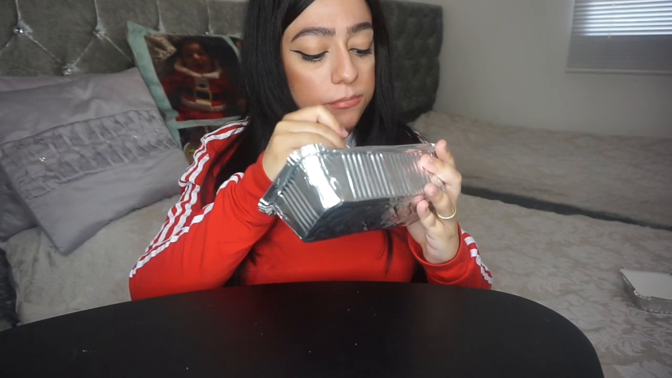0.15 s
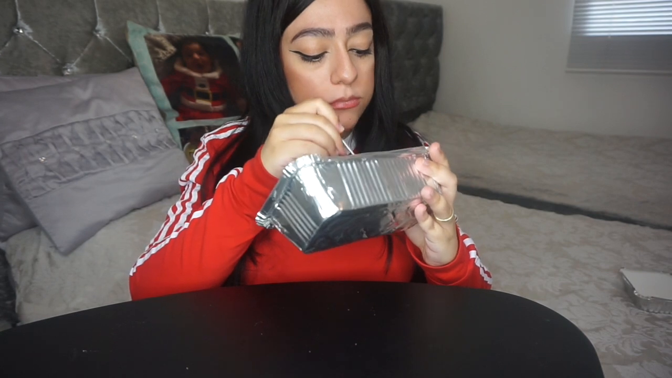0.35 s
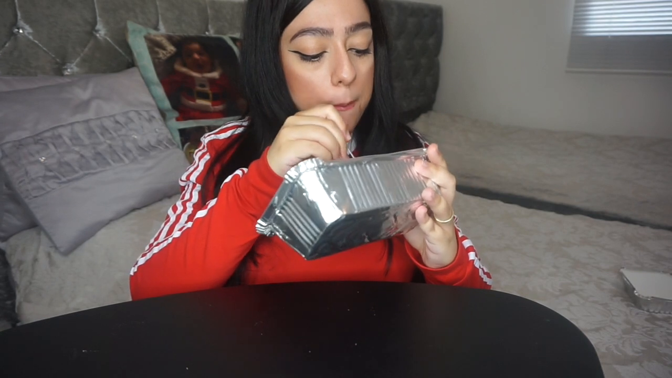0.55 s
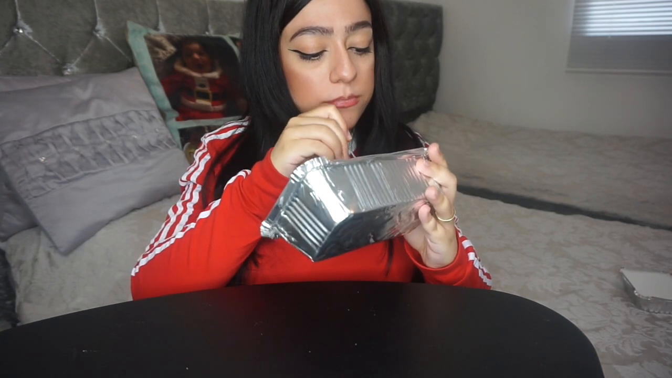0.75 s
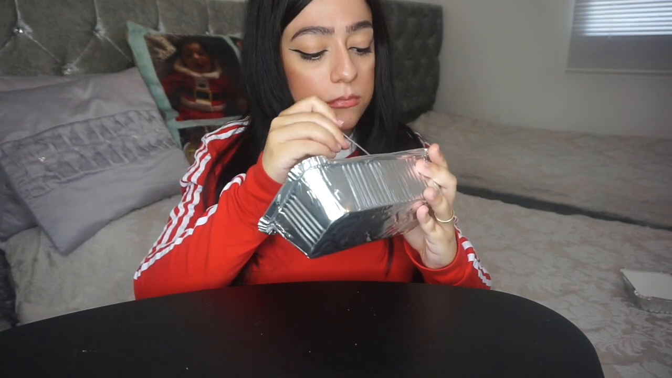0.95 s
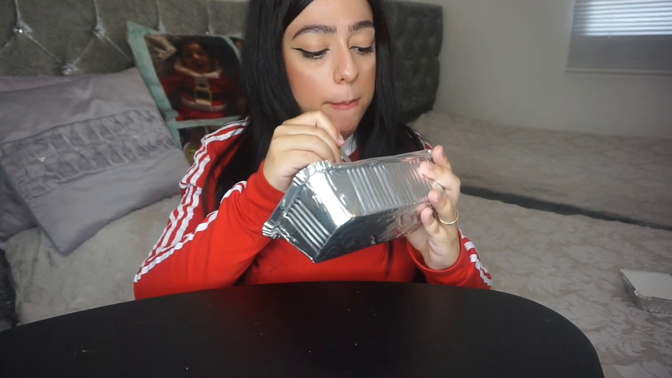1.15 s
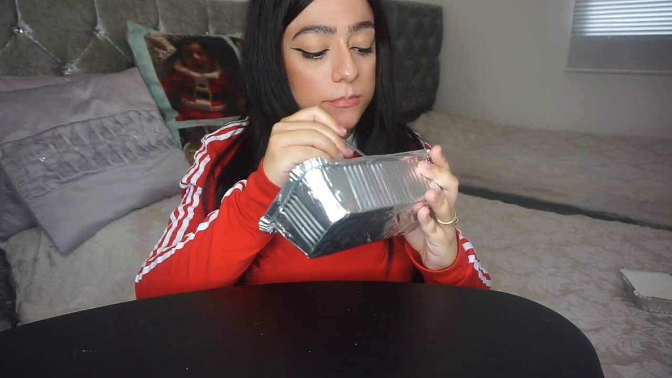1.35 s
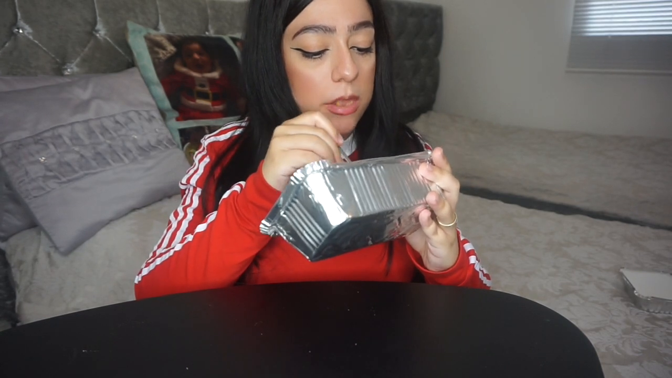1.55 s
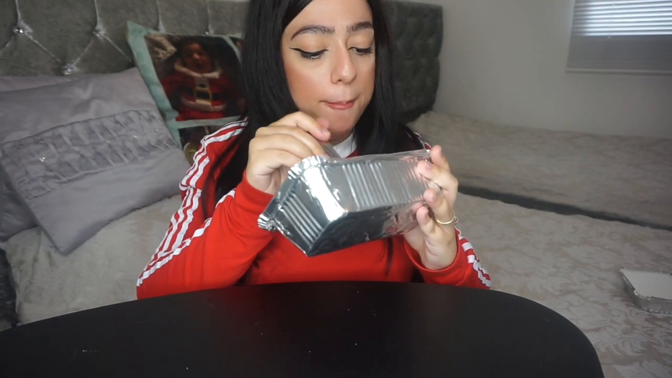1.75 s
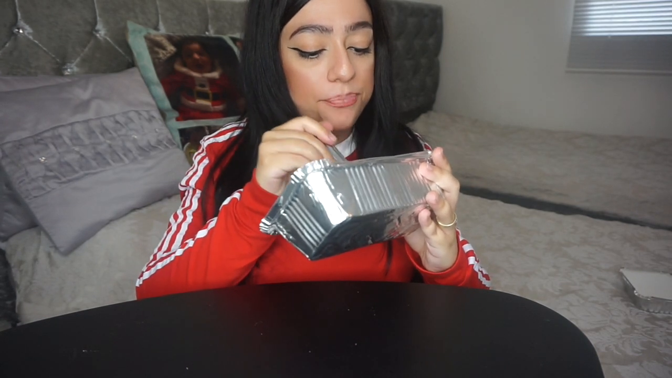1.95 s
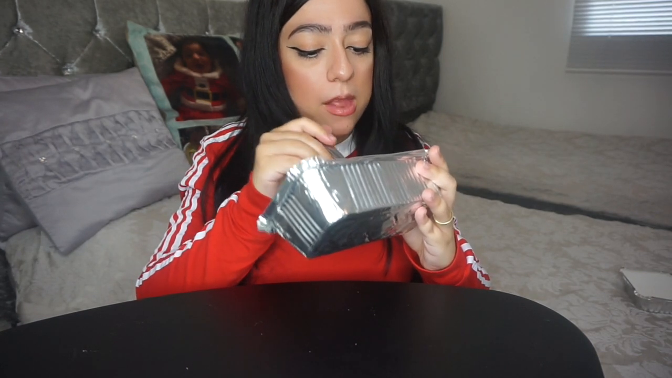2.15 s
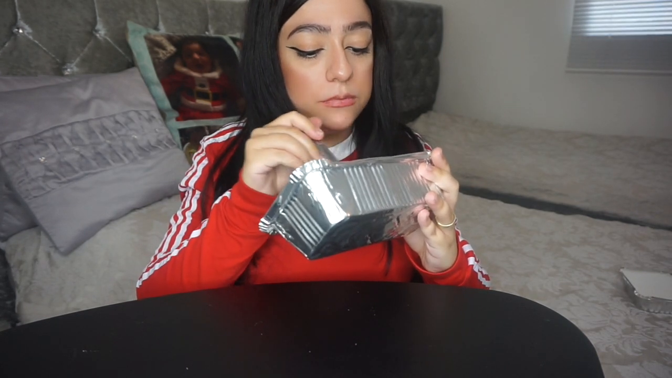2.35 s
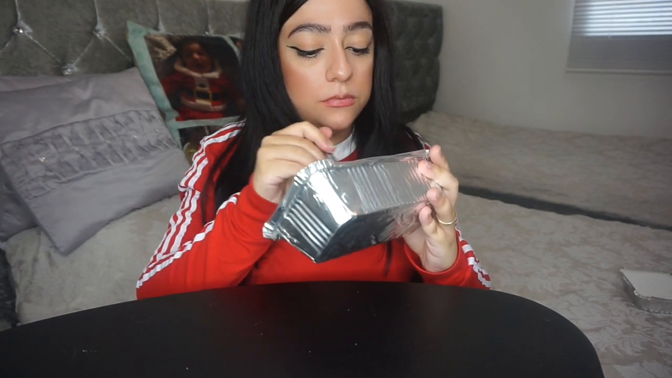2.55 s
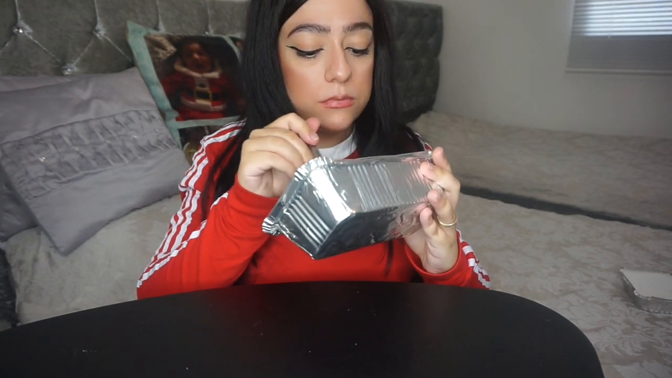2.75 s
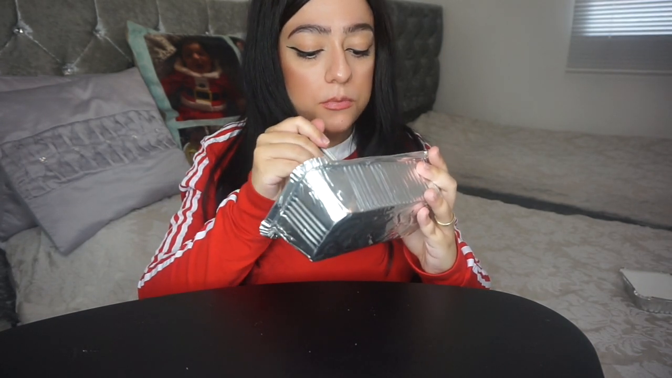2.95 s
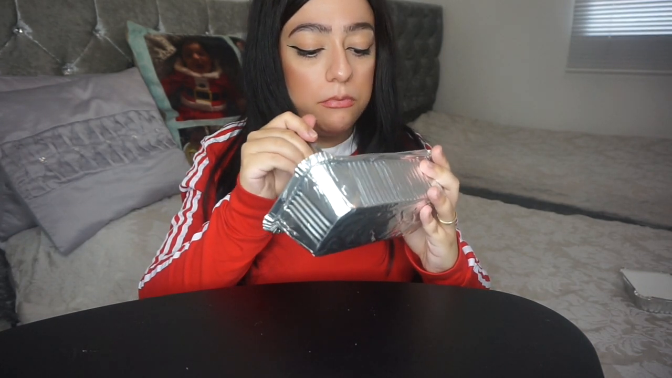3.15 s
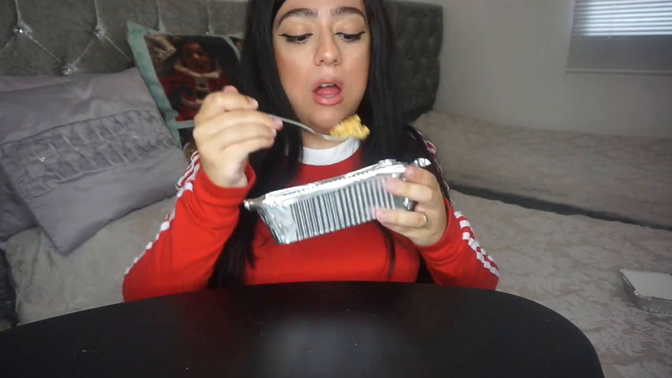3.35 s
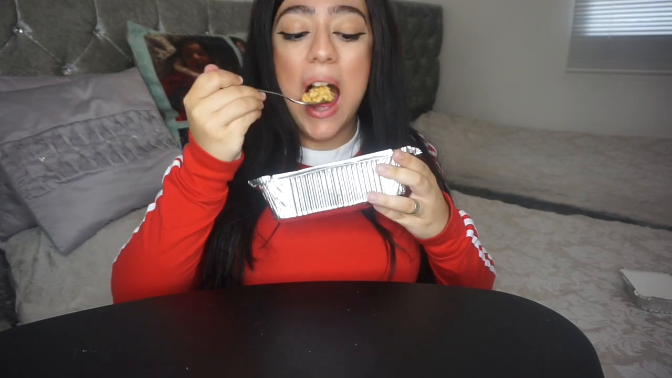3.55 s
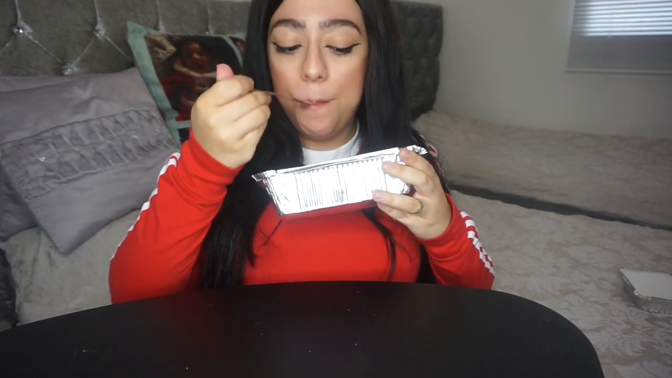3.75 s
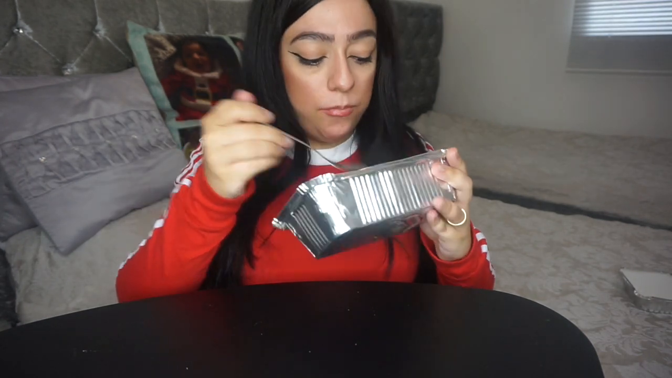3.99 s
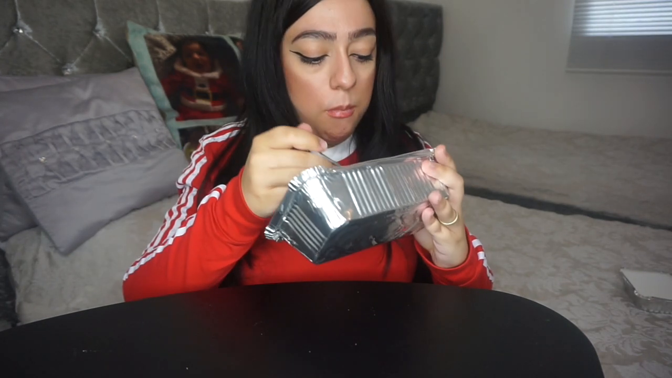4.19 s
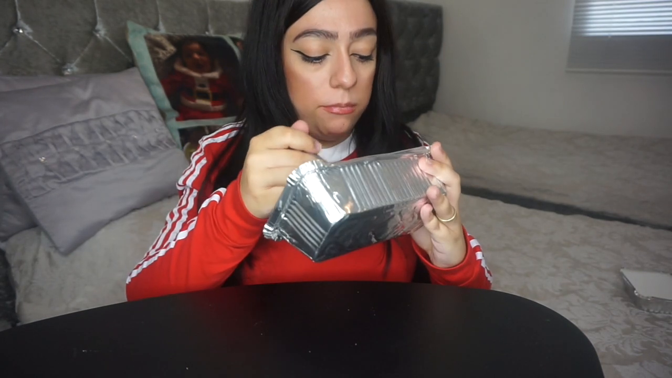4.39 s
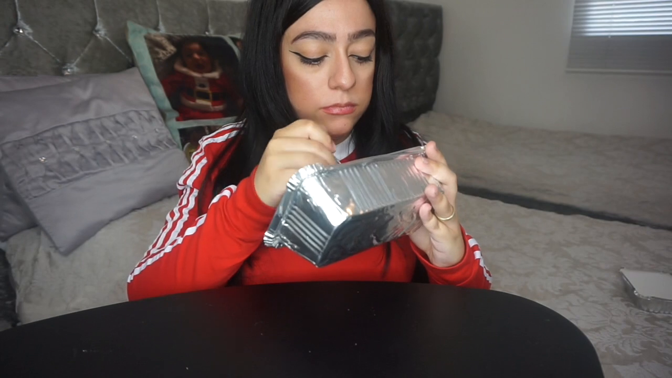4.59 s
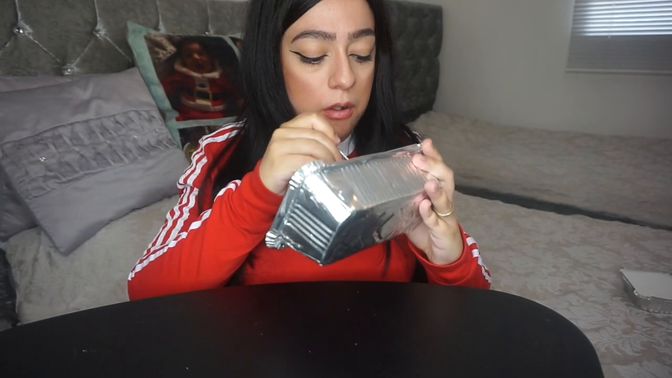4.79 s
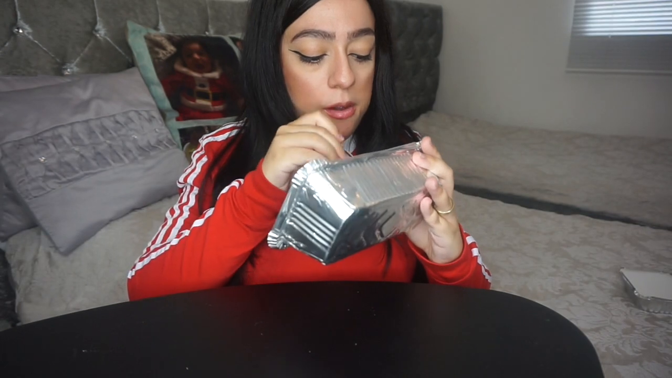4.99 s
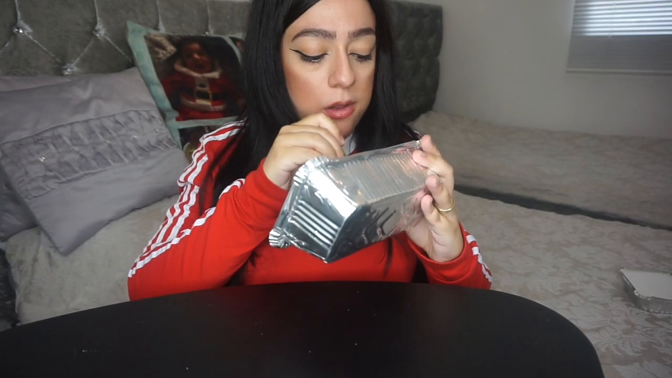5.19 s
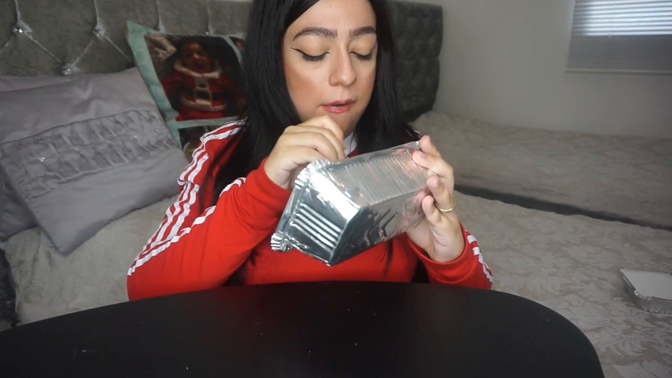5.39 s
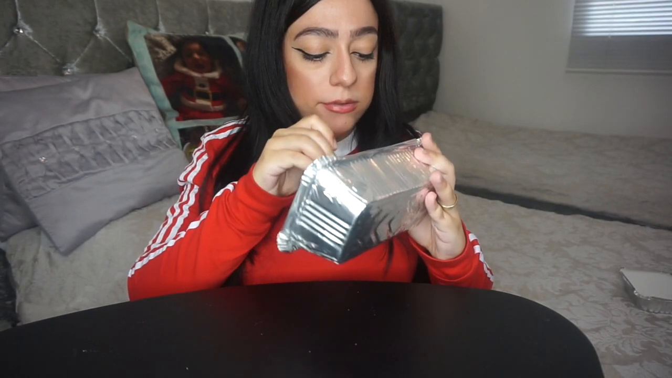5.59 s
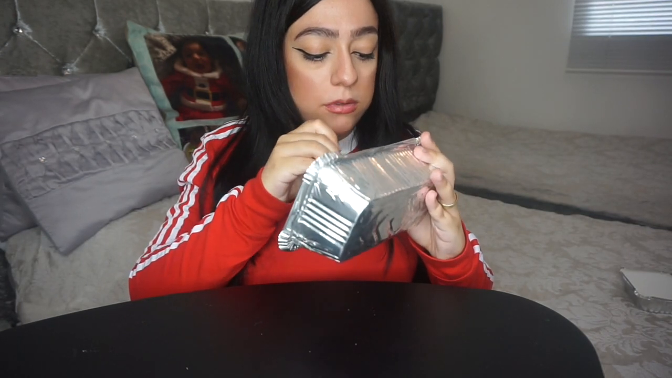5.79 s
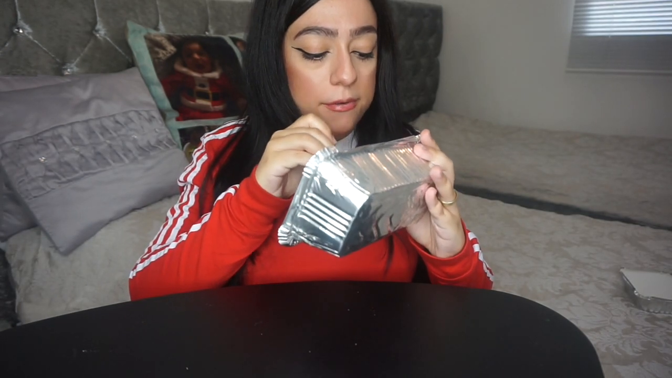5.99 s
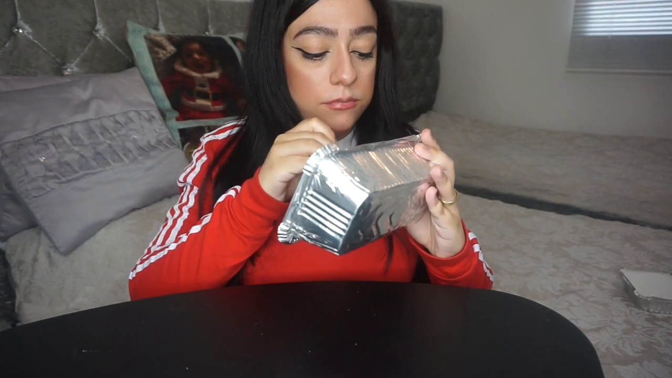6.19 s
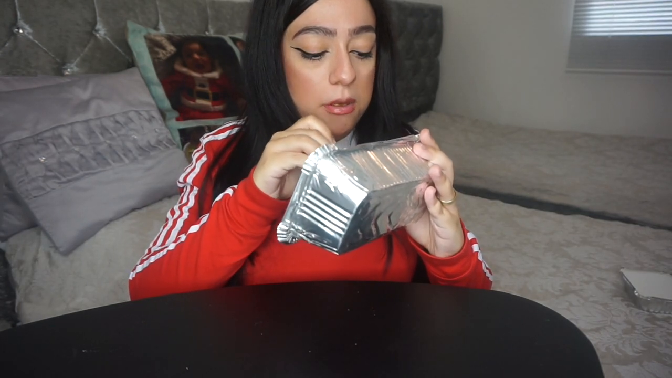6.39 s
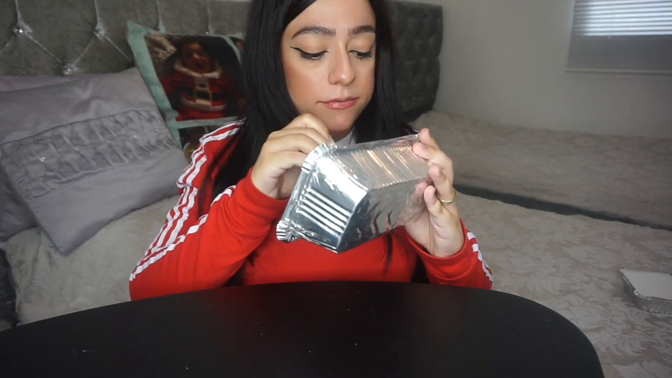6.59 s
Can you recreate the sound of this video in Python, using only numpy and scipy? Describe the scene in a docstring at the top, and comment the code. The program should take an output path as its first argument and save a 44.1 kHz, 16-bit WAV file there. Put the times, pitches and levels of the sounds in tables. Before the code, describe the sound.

In a quiet bedroom, fork tines stick and slip across the ribs of a thin aluminium tray, close to two microphones. Short dry rasps, foil pops and crackles come in uneven groups, strongest around three seconds. After a pause with only small ticks, more scrapes follow, ending with a busier cluster and fine sticky clicks. Faint high metallic pings and soft echoes surround it.

```python
"""Soft room air, then a click and a scrape: a metal fork works food out of a hand-held foil tray in a bedroom.
Each push bites at once, swells, holds or slackens, then eases off, sticking and slipping over the ribs: slips
boom in the panels, catches crackle in the foil, friction hisses. Creases snap, freed tines ring high and thin.
Sticky food ticks; a faint thin ring lingers and sinks after one hit; later a faint whine rises.
Two close microphones hear the tray in front of them and its echoes all round."""
import sys
import numpy as np
from scipy import signal
from scipy.fft import rfft, irfft
from scipy.io import wavfile
from scipy.ndimage import uniform_filter1d

SR = 44100
rng = np.random.default_rng(int(sys.argv[2]) if len(sys.argv) > 2 else 0)


def log_audio(samples):
    """Write samples as a 16-bit WAV file to the path given in sys.argv[1]."""
    # one column per channel
    frames = np.atleast_2d(samples).T
    # limit to full scale, then quantise
    limited = np.clip(frames, -1, 1)
    pcm = np.round(limited * 32767).astype(np.int16)
    wavfile.write(sys.argv[1], SR, pcm)


N = 292824


def from_db(db):
    """Decibels to gain."""
    return 10 ** (np.asarray(db) / 20)


def rms_one(x):
    """Scale to unit power."""
    return x / np.sqrt(np.mean(x ** 2) + 1e-20)


def at_hz(points, hz, axis=1):
    """Read one column of a table on a log-frequency axis."""
    points = np.array(points)
    return np.interp(np.log(np.maximum(hz, 1)), np.log(points[:, 0]), points[:, axis])


def drift(rate):
    """Smooth chance of spread 1 that takes a new direction rate times a second."""
    knots = rng.standard_normal(4096)
    return rms_one(np.interp(np.arange(N) / SR * rate, np.arange(len(knots)), knots))


def cut(x, hz, kind, order=2):
    """Butterworth low- or high-pass."""
    sos = signal.butter(order, min(hz, .45 * SR), kind, fs=SR, output="sos")
    return signal.sosfilt(sos, x + 1e-18)


def resonate(x, hz, width):
    """A resonance of the given width [Hz] that keeps the energy of a click or of white noise."""
    r = np.exp(-np.pi * width / SR)
    zeros = np.sqrt((1 - r * r) / 2) * np.array([1, 0, -1])
    poles = [1, -2 * r * np.cos(2 * np.pi * hz / SR), r * r]
    return signal.lfilter(zeros, poles, x + 1e-18)


def colour(x, spectrum):
    """Shape by a spectrum with a causal filter of unit energy."""
    gain = from_db(at_hz(spectrum, np.linspace(0, SR / 2, 513)))
    # the minimum-phase step takes the square root of the squared spectrum
    symmetric = np.roll(irfft(gain ** 2), 511)[:-1] * np.hanning(1023)
    taps = signal.minimum_phase(symmetric)
    return signal.oaconvolve(x, taps / np.linalg.norm(taps))[:N]


def add(track, s, sound):
    """Mix a short sound in at a time."""
    start = int(s * SR)
    track[start:start + len(sound)] += sound[:N - start]


def burst(decay_s, size=512):
    """A tiny crunch of noise with an even spectrum and unit energy."""
    fade = np.exp(-np.arange(size) / (decay_s * SR))
    grains = rng.standard_normal(size) * fade
    grains = irfft(np.exp(1j * np.angle(rfft(grains)))) * np.sqrt(np.sqrt(fade))
    return grains / np.linalg.norm(grains)


# pushes of the fork: (start [s], press [s], ease [s], rise while pressing, negative slackens [dB],
# then drive at the end of the press: panel boom [dB], foil crackle [dB], tine hiss [dB];
# panel pitch favoured [Hz], give of the floor [dB])
FORK_PUSHES = [ (0.237, 0.096, 0.014, -2.5, -39.5, -34, -39, 610, -10),
               (0.458, .005, 0.072, 0, -43, -47.5, -66, 600, -1),
               (0.516, .044, 0.059, 8, -36.5, -32, -39.5, 714, .5),
               (0.779, .005, 0.031, -4, -38, -37, -51, 680, -6),
               (0.813, 0.035, 0.027, -0.5, -26.5, -28.5, -34.5, 660, 2),
               (1.074, .006, 0.072, -4, -33, -31, -51, 1180, -10),
               (1.17, 0.024, .026, 5, -27.5, -31, -30.5, 920, -1.5),
               (1.236, .004, 0.028, 0, -38, -35, -33, 920, -3),
               (1.496, 0.021, 0.037, 6.5, -20.5, -20, -30, 856, -10),
               (1.566, 0.014, 0.035, 6, -25, -25, -25, 910, -22),
               (1.862, 0.089, 0.031, 2.5, -28.5, -32.5, -29.5, 1000, -2.5),
               (1.954, 0.0059, 0.013, -6, -22, -32, -45, 1050, -2),
               (2.25, 0.076, 0.0062, 7, -30, -29, -29.5, 1060, 4.5),
               (2.546, .003, 0.024, -11, -26, -33.5, -38.5, 390, 0),
               (2.58, 0.046, 0.042, 4.5, -35, -29, -31.5, 1170, -10),
               (2.668, 0.0049, 0.019, 4, -17, -39, -50, 1150, 3),
               (2.888, 0.12, 0.049, 5, -20.5, -22.5, -26, 1060, 2.5),
               (3.397, 0.046, 0.024, 5.5, -18.5, -27, -27.5, 710, -12),
               (4.329, 0.062, 0.028, 1, -32.5, -36, -36.5, 960, 6.5),
               (4.604, 0.082, .028, 9.5, -30.5, -29.5, -38.5, 990, 2),
               (4.885, 0.035, 0.049, 3, -26.5, -27, -34.5, 685, 0),
               (5.146, 0.033, 0.034, 13, -23.5, -26, -33, 1030, 2),
               (5.382, 0.0058, 0.072, -6.5, -23, -26, -32, 1090, -1.5),
               (5.696, 0.0047, 0.12, -16.5, -39.5, -42, -48, 1100, 3),
               (5.761, 0.013, 0.046, 6, -22.5, -37, -36.5, 790, 2),
               (5.836, 0.026, 0.023, 13, -21, -21.5, -26.5, 1060, 1.5),
               (6.214, 0.031, 0.071, 11.5, -35, -34, -41.5, 1220, 5),
               (6.39, .003, 0.087, 5, -47.5, -42.5, -50, 1210, 5),
               (6.496, 0.0087, 0.059, 0, -27.5, -28, -35.5, 1170, -5),
               (6.554, 0.016, 0.028, 8, -24, -33, -38, 1150, -3.5)]


def stroke_force(bite_s, lift_s, slacken_db=11.5):
    """Each push bites at once, swells, holds or slackens while pressing, then eases off and lifts."""
    t, force = np.arange(N) / SR, np.zeros((3, N))
    for start, press_s, ease_s, rise_db, boom_db, crackle_db, hiss_db, _, _ in FORK_PUSHES:
        pressed = start + press_s
        end = pressed + ease_s
        near = (t > start - bite_s) & (t < end + lift_s)
        contact = np.interp(t[near], [start - bite_s, start, end, end + lift_s], [0, 1, 1, 0])
        pressure_db = np.interp(t[near], [start, pressed, end], [-rise_db, 0, -slacken_db])
        drives = from_db([boom_db, crackle_db, hiss_db])
        force[:, near] += np.outer(drives, contact * from_db(pressure_db))
    return force


def touch_db(hz, favour_db=7, octaves=0.47, deep_hz=400):
    """Modes near the touched panel's pitch speak most; the deep ones need the floor to give."""
    start, press_s, *_, favoured, give_db = np.transpose(FORK_PUSHES)
    nearness = np.exp(-(np.log2(hz / favoured) / octaves) ** 2)
    db = favour_db * (nearness - .5) + give_db / (1 + (hz / deep_hz) ** 4)
    return np.interp(np.arange(N) / SR, start + press_s, db)


def stick_slip(slips_per_s, jitter_db, uneven_db, slide_s, even_s):
    """Uneven slips of the tines, and the burst of fine friction that follows each; both of steady power."""
    travel = np.cumsum(slips_per_s * from_db(jitter_db * drift(200))) / SR
    slips = np.diff(np.floor(travel), prepend=0) * from_db(uneven_db * rng.standard_normal(N))
    slips = slips / np.sqrt(uniform_filter1d(slips ** 2, int(even_s * SR)) + 1e-4)
    sliding = signal.lfilter([1], [1, -np.exp(-1 / (slide_s * SR))], slips ** 2)
    friction = np.sqrt(sliding) * rng.standard_normal(N)
    return rms_one(slips * rng.choice([-1, 1], N)), rms_one(friction)


# the fork catches and the foil snaps: (time [s], drive level [dB], snap pitch [Hz],
# boom drive relative to that level [dB], tick drive relative to that level [dB])
FOIL_SNAPS = [(0.2345, -12, 2660, -4.5, -20.5), (0.2631, -15.5, 2230, -4, -27),
              (0.3099, -21.5, 2690, -20, -16), (0.5137, -18, 2880, -3.5, -27),
              (0.5589, -17.5, 3170, -2, -19.5), (0.7757, -17, 3080, -9.5, -22.5),
              (0.798, -25.5, 2940, -12, -15), (0.817, -12, 2940, -5, -17.5), (0.836, -13.5, 3080, -9, -18),
              (0.8457, -18.5, 2720, 4, -16), (1.0704, -12, 2320, -6.5, -11.5), (1.117, -27, 3000, 1, -2.5),
              (1.1913, -18, 1637, 0, -32), (1.2332, -20, 3140, -5.5, -3.5),
              (1.495, -11.5, 2710, 1.5, -11.5), (1.527, -14.5, 2650, -12, -16), (1.862, -16, 2620, -2, -19),
              (1.9588, -19.5, 2400, 6.5, -15), (2.2377, -24.5, 3500, -10, -7),
              (2.5453, -19, 1870, 1.5, -31), (2.612, -16, 3500, -7.5, -7.5), (2.6689, -11, 1910, -7, -41),
              (2.6722, -17.5, 2980, 1, -18.5), (2.8889, -15, 1900, -2.5, -8.5),
              (2.9722, -9.5, 2970, -6, -18.5), (2.9865, -13, 3000, -24, -24), (2.999, -6, 2220, -3.5, -37),
              (3.028, -17.5, 2700, 5.5, -31), (3.353, -42.5, 2090, 6.5, -20),
              (4.3289, -27.5, 1860, 3.5, -25), (4.6034, -25, 2560, 2.5, -22), (4.6381, -22, 2520, -6, -29),
              (4.6705, -18.5, 2390, -1.5, -16), (4.88, -17, 2850, -10, -36), (4.9199, -19, 3020, -6, -20),
              (5.1627, -21.5, 2470, 0.5, -16), (5.3848, -19, 3750, 3.5, -29), (5.391, -23, 3100, 7, -23),
              (5.6942, -34.5, 2250, 1, -10), (5.761, -27, 1700, 7.5, -15), (5.8365, -15.5, 2000, -6.5, -19),
              (5.8564, -14.5, 1600, -14, -12.5), (5.8636, -13, 1890, -13, -20),
              (6.243, -27, 3050, 1, -14.5), (6.4945, -16.5, 3160, -5, -33), (6.538, -17.5, 1910, -13, -21),
              (6.563, -19.5, 1730, -15, -14.5)]


def snaps(width_hz, crunch_s, rebound, rebound_cycles):
    """A crease pops through and rebounds: a push on the panels, a short ring at its own pitch, a bright tick."""
    push, ring, tick = np.zeros((3, N))
    for s, db, hz, boom_db, tick_db in FOIL_SNAPS:
        crease = resonate(resonate(signal.unit_impulse(512), hz, width_hz), hz, 2 * width_hz)
        crease = from_db(db) * crease / np.linalg.norm(crease)
        rebound_s = rebound_cycles * rng.uniform(.7, 1.501) / hz
        add(push, s, from_db([db + boom_db]))
        add(ring, s, crease)
        add(ring, s + rebound_s, rebound * crease)
        add(tick, s, from_db(db + tick_db) * burst(crunch_s))
    return push, ring, tick


def body(drive, modes, wander_db, moves_per_s, favour=lambda hz: 0):
    """Parallel modes; how hard each is driven depends on where the fork touches."""
    out = 0
    for k, (hz, width, db) in enumerate(modes):
        level_db = db + favour(hz) + wander_db * drift(moves_per_s)
        out = out + (-1) ** k * resonate(drive * from_db(level_db), hz, width)
    return out / np.linalg.norm(from_db(np.array(modes)[:, 2]))


# bending modes of the tray's floor and walls: (pitch [Hz], width [Hz], relative level [dB])
TRAY_PANELS = [(224, 26, -5), (313, 37.4, -4), (349.5, 36, -4), (418, 55, -4), (523, 49, 3), (612.6, 64, 1),
               (729, 16.4, -6), (757, 30, -6), (890, 89, 2.5), (999, 88, -2), (1078.5, 38, 2.5),
               (1127, 83, -2), (1225, 99, 5.5), (1300, 210, -4), (1590, 140, 3), (471, 59, -7),
               (149, 82, -13.5), (850, 1500, 1.5)]
# stiff ribs and creases of the foil: (pitch [Hz], width [Hz], relative level [dB])
TRAY_RIBS = [(1842, 100, 0), (2490, 370, -9.5), (3064, 190, 3), (3210, 1070, 2.5), (3925, 304, 3.5),
             (2480, 2800, 1.5)]
# colour of metal rubbing on foil: (frequency [Hz], relative level per Hz [dB])
RUB_COLOUR = [(2500, -8), (4500, 2), (6000, -1), (8000, -2.5), (10000, -1), (12500, 3.5), (15000, -1),
              (17000, -10)]


def fork_on_tray():
    """Fine slips drive the panels and the rubbing hiss; coarser catches on the ribs make the foil crackle."""
    boom, crackle, hiss = stroke_force(bite_s=.001, lift_s=.014)
    slips, friction = stick_slip(slips_per_s=260, jitter_db=4, uneven_db=2, slide_s=.002, even_s=.035)
    catches, crumple = stick_slip(slips_per_s=125, jitter_db=5, uneven_db=4.5, slide_s=.001, even_s=.022)
    push, ring, tick = snaps(width_hz=910, crunch_s=.0031, rebound=1.0, rebound_cycles=3.43)

    panel_drive = boom * (from_db(-0.5) * slips + from_db(-8.0) * friction) + from_db(19) * push
    panels = body(panel_drive, TRAY_PANELS, wander_db=1.5, moves_per_s=9, favour=touch_db)
    panels = cut(cut(panels, 121, "high"), 4050, "low")

    rib_drive = crackle * from_db(-7.5) * (crumple + catches + 0.68 * friction) + from_db(5) * push
    ribs = body(rib_drive, TRAY_RIBS, wander_db=3.5, moves_per_s=60) + from_db(10.5) * ring
    ribs = cut(ribs, 3840, "low", order=4)

    rub_drive = hiss * from_db(-9.0) * (friction + .5 * crumple) + from_db(21.5) * tick
    return panels + ribs + colour(rub_drive, RUB_COLOUR)


# the tines spring free: (time [s], relative level [dB])
TINE_RELEASES = [(1.233, -23.5), (1.255, -31), (2.612, -39), (5.858, -40)]
# ringing modes of the tines: (pitch [Hz], width [Hz], relative level [dB])
TINE_RING = [(7660, 340, -4.5), (8030, 200, -11.5), (14100, 2700, -6)]


def tine_pings():
    """Freed tines ring high and thin: each release is one click into their modes."""
    flicks = np.zeros(N)
    for s, db in TINE_RELEASES:
        add(flicks, s, from_db([db + 27.5]))
    return sum(from_db(db) * resonate(flicks, hz, width) for hz, width, db in TINE_RING)


# the clearest ticks of sticky food: (time [s], relative level [dB], pitch [Hz])
CLEAR_TICKS = [(1.449, -47, 1700), (1.641, -26, 11400), (1.667, -32, 12200), (1.6867, -31, 3800),
               (1.7235, -33, 6760), (2.187, -37, 15500), (2.399, -42, 4680), (3.5316, -36, 5100),
               (3.858, -33.5, 14500), (6.081, -36.5, 11800), (6.465, -35.5, 12000)]
# how much the food sticks and parts: (time [s], share of the full stray tick rate [0-1])
FOOD_STICKINESS = [(0, .01), (1.5, .01), (1.75, .4), (3.2, .01), (4.5, .01), (4.8, .2), (5.35, .25),
                   (5.6, 1), (6.64, .8)]


def food_ticks(width_hz, stray_per_s, stray_db):
    """Sticky food parts with short, pitched ticks; others come at random, most during the last strokes."""
    out = np.zeros(N)
    for s, db, hz in CLEAR_TICKS:
        tick = resonate(resonate(burst(0.0017), hz, width_hz), hz, width_hz)
        add(out, s, from_db(db + 14.0) * tick / np.linalg.norm(tick))
    busy = np.interp(np.arange(N) / SR, *np.transpose(FOOD_STICKINESS))
    pitches = np.geomspace(8840, 14500, 12)  # stray ticks [Hz]
    for hz in pitches:
        chance = busy * stray_per_s / len(pitches) / SR
        born = (rng.random(N) < chance) * rng.uniform(.3, 1.6, N)
        out += from_db(stray_db) * resonate(resonate(born, hz, hz / 8), hz, hz / 8)
    return out


# the bedroom's echo by band: (centre [Hz], time to fall 60 dB [s], relative level [dB],
# left-right likeness [-1 to 1])
ROOM_ECHO = [(100, 0.56, -6.5, 0.79), (393, 0.46, -5, 0.31), (1000, 0.19, -3, 0.21),
             (2240, 0.34, -1.5, 0.25), (3800, .28, -1, 0.095), (6000, 0.36, 2, 0.14),
             (13000, 0.37, -8, 0.51)]


def diffuse(size):
    """White stereo noise as sound from all sides reaches two close microphones."""
    mid, side = rfft(rng.standard_normal((2, size)))
    alike = np.clip(at_hz(ROOM_ECHO, np.linspace(0, SR / 2, len(mid)), axis=3), -1, 1)
    shared = np.sqrt((1 + alike) / 2) * mid
    opposed = np.sqrt((1 - alike) / 2) * side * [[1], [-1]]
    return irfft(shared + opposed, size)


def room_response(first_echo_s, late_db, late_t60, late_top_hz=2000):
    """Dense echoes die band by band, over a faint, longer and duller tail."""
    t = np.arange(SR) / SR
    noise, hz = rfft(diffuse(SR)), np.arange(SR // 2 + 1)
    centres, response = np.array(ROOM_ECHO)[:, 0], 0
    # each row of the identity picks out one band, cross-faded with its neighbours
    for own, (centre, t60, db, _) in zip(np.eye(len(ROOM_ECHO)), ROOM_ECHO):
        band = irfft(noise * at_hz(np.column_stack([centres, own]), hz))
        late = from_db(late_db - 60 * t / late_t60) / np.hypot(1, centre / late_top_hz)
        decay = (from_db(-60 * t / t60) + late) * (t > first_echo_s)
        response = response + from_db(db) * band * decay / np.linalg.norm(decay)
    return response


def bedroom(x, wet_db, patterns_per_s, count=4):
    """Several patterns of dense echoes cross-fade, so that no single one colours the whole sound."""
    place, out = np.arange(N) / SR * patterns_per_s, 0
    for k in range(count):
        away = np.abs((place - k) % count - count / 2)
        share = np.cos(np.pi / 2 * np.minimum(away, 1))
        response = room_response(first_echo_s=.003, late_db=-16, late_t60=0.99)
        out = out + signal.fftconvolve((x * share)[None], response, axes=1)[:, :N]
    return from_db(wet_db) * out


# a thin ring after one hit, then a whine: (start [s], length [s], starting pitch [Hz],
# glide [Hz per s], starting level [dB], fading [dB per s, negative grows])
FAINT_TONES = [(2.686, 0.66, 1410, -29.5, -58, 25), (5.55, 1.4, 704, 72, -57.5, -1.5)]


def faint_tones(edge_s=0.039, waver_db=5.0, waver_hz=8):
    """Sines that waver in pitch and level: the ring sinks and fades, the whine rises and grows slightly."""
    out = 0
    for start, length_s, hz, glide, db, fading in FAINT_TONES:
        age = np.clip(np.arange(N) / SR - start, 0, length_s)
        gate = np.clip(np.minimum(age, length_s - age) / edge_s, 0, 1)
        level = gate * from_db(db - fading * age + waver_db * drift(7.7))
        pitch = hz + glide * age + waver_hz * drift(70)
        phase = 2 * np.pi * np.cumsum(pitch) / SR
        out = out + level * np.sqrt(2) * np.sin(phase)
    return out


# colour of the still air of the room: (frequency [Hz], relative level per Hz [dB])
AIR_COLOUR = [(15, -49), (25, -13.5), (84, -13), (114, -10.5), (145, -9), (180, -7), (270, -10.5),
              (309, -3), (373, -6), (2480, -17), (2990, -20.5), (7710, -27.5), (14800, -28), (16000, -20.5)]


def air(level_db=-52.5):
    """Soft steady noise of room and microphones, shaped from white stereo noise."""
    noise = rfft(diffuse(N))
    gain = from_db(at_hz(AIR_COLOUR, np.linspace(0, SR / 2, noise.shape[1])))
    return from_db(level_db) * rms_one(irfft(noise * gain, N))


# level between the two microphones: (frequency [Hz], left minus right [dB])
CAPSULE_BALANCE = [(60, 0), (110, -0.3), (200, 0), (380, -0.5), (700, -2), (1290, -2), (2380, -2.0),
                   (4400, -3), (8120, -1.5), (15000, 0.0)]
# phase between them for sound from one direction: (frequency [Hz], lead of the left [radians])
CAPSULE_PHASE = [(0, 0), (520, 0.24), (1290, 0.31), (1810, 0.9), (2500, 0.59), (3100, 0.43), (3700, 0.38),
                 (5600, 2.2), (7060, 1.3), (8700, 0.6), (11900, -1.1), (13200, -0.41), (14100, -1.2),
                 (16400, -1.2)]


def microphones(x, aim):
    """The capsules differ in level, and in phase as far as sound comes from one direction (aim 0-1)."""
    spectrum = rfft(x)
    hz, sides = np.linspace(0, SR / 2, spectrum.shape[-1]), np.array([[.5], [-.5]])
    gain = from_db(sides * at_hz(CAPSULE_BALANCE, hz))
    lead = np.exp(1j * aim * sides * at_hz(CAPSULE_PHASE, hz))
    return irfft(spectrum * gain * lead, N)


def scene():
    """The tray in front, the room all round; the pings beam at the microphones and excite the room less."""
    tray = fork_on_tray() + food_ticks(width_hz=6000, stray_per_s=45, stray_db=-36.5)
    pings = tine_pings()
    room = bedroom(tray + from_db(-7) * pings, wet_db=-2.0, patterns_per_s=7)
    near = microphones(tray + pings, aim=0.95)
    around = microphones(room, aim=0.17)
    return near + around + faint_tones() + air()


def record(dry):
    """Deep rumble is rolled off and the top is cut steeply."""
    lean = cut(dry, 31, "high")
    # order 10, 0.1 dB ripple, 80 dB down above the 15.9 kHz edge
    top_cut = signal.ellip(10, .1, 80, 15900, fs=SR, output="sos")
    return signal.sosfilt(top_cut, lean)


dry = scene()
out = record(dry)
log_audio(out)
```